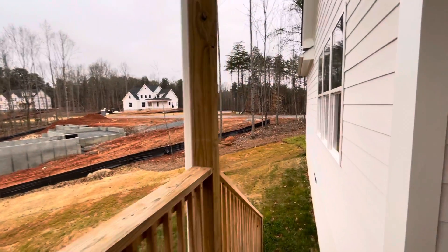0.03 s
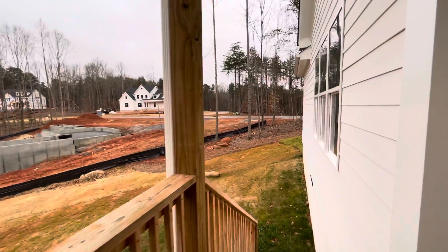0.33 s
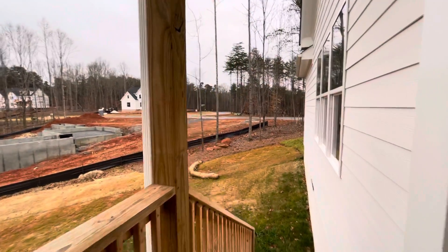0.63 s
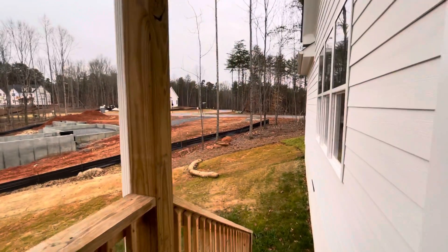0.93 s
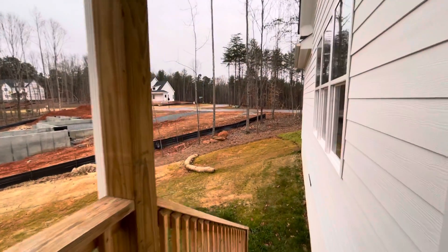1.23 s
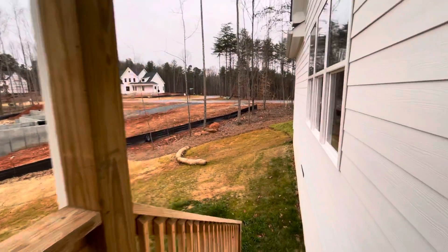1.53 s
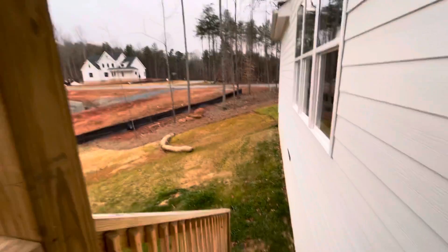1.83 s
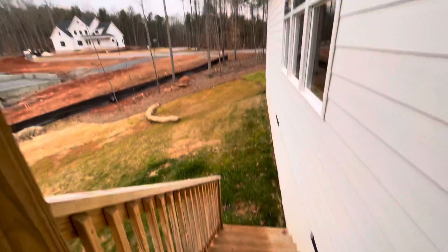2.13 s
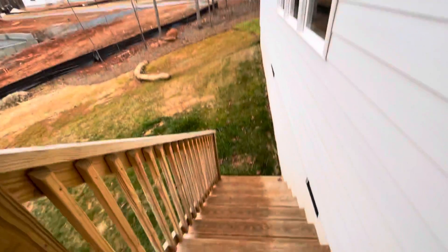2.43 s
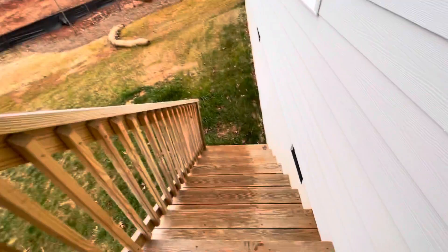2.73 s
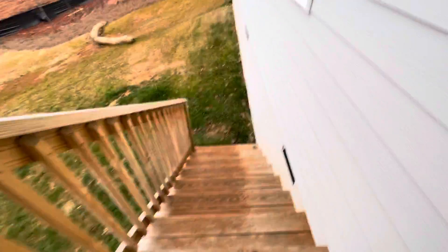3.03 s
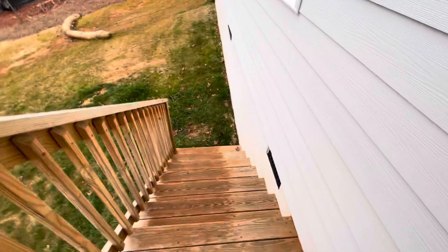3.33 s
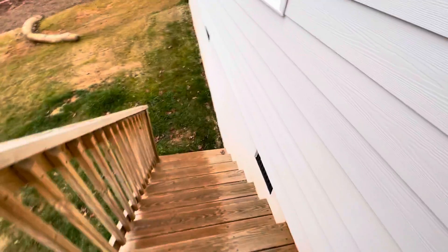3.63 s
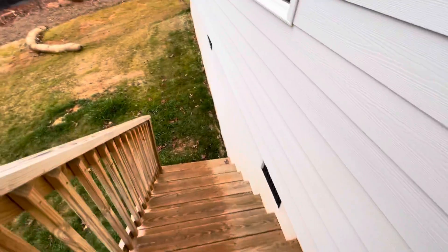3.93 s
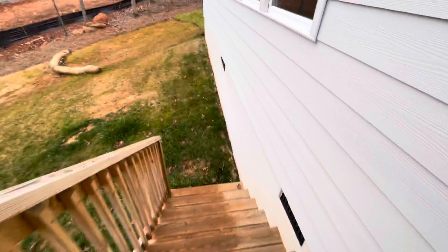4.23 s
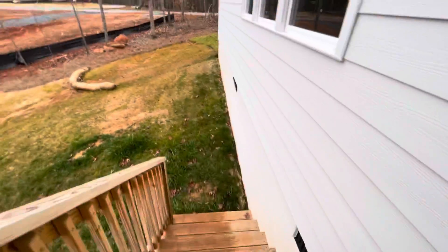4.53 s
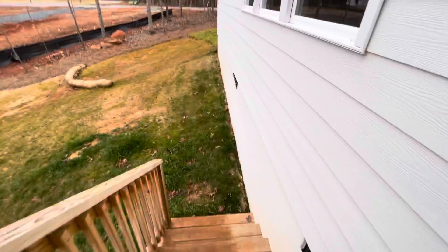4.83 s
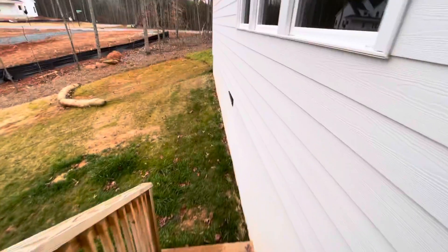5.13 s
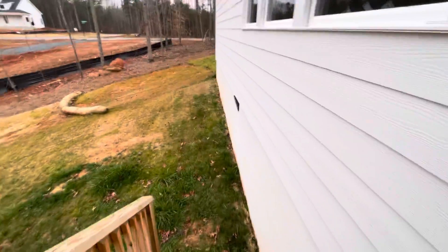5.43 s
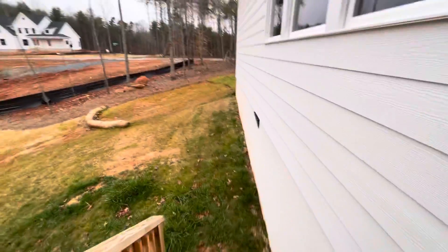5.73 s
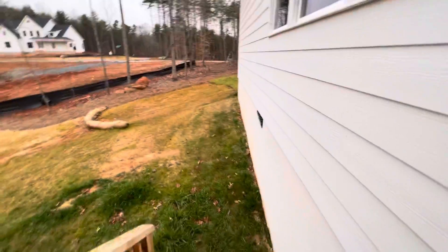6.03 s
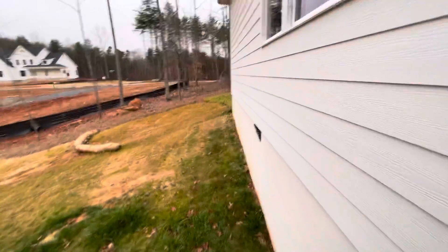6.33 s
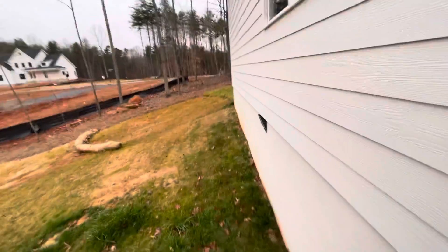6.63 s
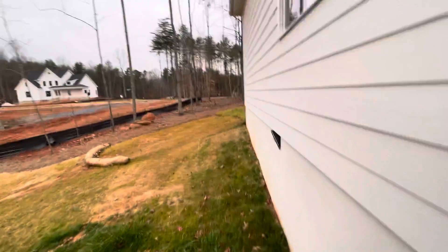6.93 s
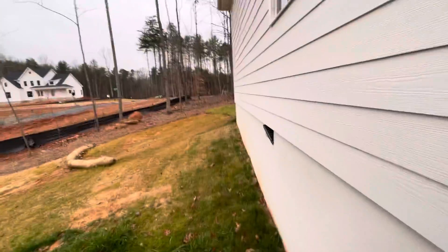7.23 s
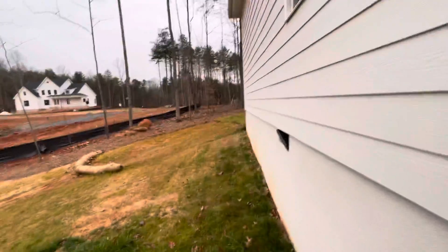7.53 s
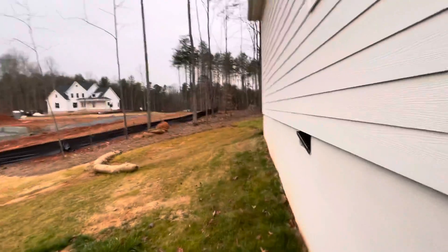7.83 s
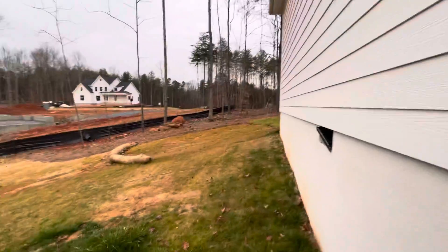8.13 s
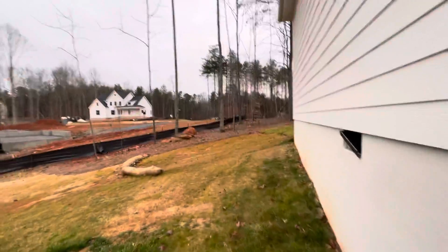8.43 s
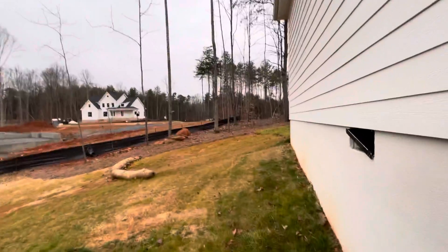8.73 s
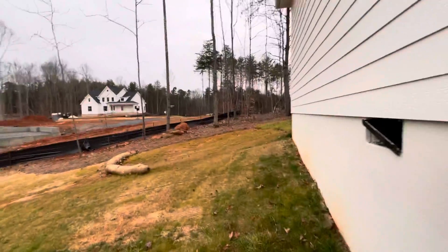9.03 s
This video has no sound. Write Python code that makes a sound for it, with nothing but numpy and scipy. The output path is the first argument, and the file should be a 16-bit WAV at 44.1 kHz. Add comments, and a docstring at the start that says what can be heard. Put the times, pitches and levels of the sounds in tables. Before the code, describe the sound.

Footsteps cross a wooden porch and clop down outdoor stairs, with swishing clothes over a distant machine rumble.

```python
"""Someone crosses a wooden porch with soft steps, clothes swishing, over the rumble of distant machines.
About 2.5 s in, a bird gives one thin, falling note and the boards begin to snap underfoot.
From 4.3 s the walker goes down the outdoor stairs: each footfall ticks and clops on a tread, rings
the plank and thumps the frame; a softer heel knock follows most landings. A few boards squeak against
their nails, and the cloth keeps swishing past the last step at 8.4 s."""
import sys
import numpy as np
from scipy import signal
from scipy.fft import rfft, irfft
from scipy.io import wavfile
from scipy.ndimage import uniform_filter1d

SR = 44100
rng = np.random.default_rng(int(sys.argv[2]) if len(sys.argv) > 2 else 0)


def digitize_waveform(pressure):
    """Quantize a signal to 16-bit integers and store it at the path in sys.argv[1].

    Rows of a 2-D input are taken as channels; values are limited to [-1, 1].
    """
    field = np.atleast_2d(pressure).T
    bounded = np.clip(field, -1, 1)
    quanta = np.round(bounded * 32767).astype(np.int16)
    wavfile.write(sys.argv[1], SR, quanta)


N = 409688
TIME = np.arange(N) / SR
AGE = TIME[:SR * 6 // 10]  # seconds since a hit


def footsteps():
    """Gentle porch steps, then hard stair landings; a softer heel knock follows most landings."""
    # soft porch steps: (time [s], knock [dB], thump [dB], pitch [ratio], deck send [dB])
    porch_steps = [(0.382, -47.5, -39, 0.59, 6), (0.418, -71, -37, 0.91, -18), (0.495, -36, -56, 1.09, 7.5),
                   (0.548, -44, -39, 1.12, 9.5), (0.701, -58.5, -64, 0.63, 13.5),
                   (1.377, -57, -34.5, 0.93, 2.5), (1.604, -47.5, -38, 0.86, 3.5),
                   (2.151, -58, -44, 1.5, 5), (3.047, -50.5, -42, 0.85, 7.5),
                   (3.098, -49.5, -41.5, 0.58, -6), (3.361, -47.5, -50.5, 1.19, 6.5)]
    # stair landings: (time [s], knock [dB], thump [dB], tick [dB], pitch [ratio], deck send [dB], clop [dB])
    stair_steps = [(4.3111, -28.5, -29.5, -48.5, 0.96, 4.5, -36), (5.071, -28, -32, -41.5, 1.006, 0, -32.5),
                   (5.6606, -29, -31, -38.5, 0.95, 1.5, -31.5), (6.198, -26, -35, -35, 1, 2.5, -30),
                   (6.764, -28, -21, -37, 1.02, -1.5, -31.5), (7.247, -18, -24.5, -34.5, 1.01, -6, -29),
                   (7.768, -31.5, -20.5, -40.5, 0.92, -0.5, -47), (8.3674, -26, -33, -51, 1.095, -1.5, -25)]
    # the rest of the foot coming down or shifting: (time [s], knock [dB], thump [dB])
    heels = [(4.356, -34, -42), (4.439, -37.5, -43), (5.031, -48, -58), (5.191, -48, -45),
             (5.373, -63, -43), (5.782, -44.5, -41.5), (6.219, -36.5, -55), (6.325, -47.5, -44),
             (6.881, -41.5, -43), (6.902, -30, -39), (7.876, -40.5, -35.5), (7.93, -50.5, -50)]
    out = np.zeros((2, N))
    for s, knock_db, thump_db, pitch, send_db in porch_steps:
        add(out, s, footfall(knock_db, thump_db, tick_db=-73, pitch=pitch, send_db=send_db))
    for s, knock_db, thump_db, tick_db, pitch, send_db, clop_db in stair_steps:
        add(out, s, footfall(knock_db, thump_db, tick_db, pitch, send_db) + amp(clop_db) * clop(pitch))
    for s, knock_db, thump_db in heels:
        add(out, s, footfall(knock_db, thump_db, tick_db=knock_db - 17, pitch=1.02, send_db=-3.5))
    return out


def footfall(knock_db, thump_db, tick_db, pitch, send_db):
    """The sole ticks, the plank knocks and the weight thumps the frame; knock and thump ring the deck."""
    # woody body of a tread: (untuned frequency [Hz], relative level [dB], t60 [s])
    plank_modes = [(211, -2.5, 0.093), (298, -1, 0.077), (384.4, 0.5, 0.2), (430, -3.5, 0.18),
                   (474.4, -6.5, 0.2), (528, 4, 0.082), (569.2, -4, 0.12), (617, 8.5, 0.027),
                   (721, -8.5, 0.061), (1035, -16.5, 0.13), (1370, -23, 0.072)]
    # low end of stringers and joists: (untuned frequency [Hz], relative level [dB], t60 [s])
    frame_modes = [(142.3, 0, 0.039), (150.9, -4, 0.14), (169.6, -4, 0.078)]
    # hard face of a tread: (untuned frequency [Hz], relative level [dB], t60 [s])
    face_modes = [(1306, 2.5, 0.043), (1930, -4, 0.024), (2240, -8, 0.02), (2900, -1.5, 0.029),
                  (3540, -7.5, 0.014)]
    # a sole meeting wood: (frequency [Hz], gain [dB])
    sole_eq = [(300, -13), (800, 3), (1400, -7.5), (2000, -5), (3000, -18.5), (3900, -20.5), (4800, -25.5),
               (9000, -32), (13000, -57)]
    plank = ring(plank_modes, pitch, lag_cycles=1.174, rise_cycles=0.75, scatter_db=3, apart_hz=740)
    frame = ring(frame_modes, pitch=0.93, lag_cycles=0.5, rise_cycles=1.5, scatter_db=6)
    sole = crack(sole_eq, decay_s=0.0028, tail_db=-9, tail_s=0.021)
    face_pitch = pitch * rng.uniform(0.9, 1.15)
    face = ring(face_modes, face_pitch, lag_cycles=0.75, rise_cycles=0.54, scatter_db=-0.5)
    tick = sole + amp(-4.5) * face
    send = amp(send_db) * np.hypot(amp(knock_db - 3), amp(thump_db - 11.5))
    wood = amp(knock_db) * plank + send * deck()
    return wood * pan(-2.3) + amp(thump_db) * frame * pan(-4) + amp(tick_db) * tick * pan(-0.36)


def clop(pitch):
    """The hollow clap of a tread: its first bending wave arrives treble first and dives in pitch."""
    start_hz, end_hz = 1935 * pitch, 347 * pitch
    slide_s, rise_s, decay_s, right_late_s = 0.000538, 0.0018, 0.0053, 0.00018
    t = np.maximum(AGE - np.array([[0], [right_late_s]]), 0)
    hz = end_hz + (start_hz - end_hz) / (1 + t / slide_s)
    turns = np.cumsum(hz * (t > 0), axis=1) / SR
    envelope = (1 - np.exp(-(t / rise_s) ** 2)) * np.exp(-t / decay_s)
    return struck(envelope * np.sin(2 * np.pi * turns)) * pan(-3.3)


def deck():
    """Countless weak modes of boards and rails, each band dying at its own speed."""
    # the tail spreading through deck and railing: (frequency [Hz], gain [dB], t60 [s])
    bands = [(50, -19, 0.063), (120, 2, 0.83), (263, -5.5, 0.33), (360, -0.5, 0.42), (607, -7.5, 0.35),
             (800, -21, 0.5), (1186, -22, 0.43), (2170, -42.5, 0.053), (5030, -55, 0.013)]
    shared, left, right = rng.standard_normal((3, len(AGE)))
    hz, t, spectrum = signal.stft(shared + 0.91 * np.array([left, right]), SR, nperseg=256)
    decay = amp(-60 * t / read(bands, hz, axis=2)[:, None])
    tail = signal.istft(spectrum * decay, SR, nperseg=256)[1][:, :len(AGE)]
    attack = 1 - np.exp(-AGE / 0.0014)
    return struck(colour(tail * attack, bands))


def bounces():
    """Whole spans of the deck bounce under the walker's weight, adding sub bass to a few steps."""
    # deep sways of the joists: (time [s], frequency [Hz], level [dB])
    sways = [(.385, 38.2, -34), (0.571, 39, -35.5), (1.385, 45.2, -38), (5.666, 82.3, -30.5)]
    t60 = 0.52
    out = np.zeros((2, N))
    for s, hz, db in sways:
        sway = ring([(hz, 0, t60)], pitch=1, lag_cycles=0.14, rise_cycles=0.34, scatter_db=0)
        add(out, s, amp(db) * sway * pan(-2.5))
    return out


def snaps():
    """Boards and grit snap underfoot: a dry crack layered with a hollow knock."""
    # snap cues: (time [s], crack [dB], knock [dB])
    cues = [(2.663, -85, -49), (2.944, -62, -55), (2.954, -55.5, -47), (3.05, -58, -46), (3.153, -65, -71),
            (3.523, -58, -46), (4.915, -81, -55), (6.9, -46.5, -40), (7.286, -38.5, -40), (7.295, -64, -35),
            (7.7946, -35, -33.5), (8.283, -63.5, -60), (8.414, -50.5, -41)]
    # the bright edge of a snap: (frequency [Hz], gain [dB])
    bright_eq = [(600, -59), (1500, 16), (3000, 11.5), (4400, 12), (5500, 4), (7200, 8.5), (10000, 0),
                 (13000, -16)]
    # a board shifting on its nails: (frequency [Hz], gain [dB])
    hollow_eq = [(200, -12), (600, 4.5), (950, -2.5), (1400, -4), (2200, -26), (6000, -35)]
    out = np.zeros((2, N))
    for s, crack_db, knock_db in cues:
        bright = crack(bright_eq, decay_s=0.0021, tail_db=-13, tail_s=0.015)
        hollow = crack(hollow_eq, decay_s=0.0054, tail_db=-12.5, tail_s=0.025)
        add(out, s, (amp(crack_db) * bright + amp(knock_db) * hollow) * pan(-1))
    return out


def squeaks():
    """Short, uneven slips of wood on nail, each rising in pitch and dulling as it runs out."""
    # slips: (time [s], length [s], start pitch [Hz], end pitch [Hz], level [dB], final overtones [dB])
    slips = [(4.434, 0.019, 1965, 2080, -52, -2), (7.285, 0.017, 1257, 1415, -37, -13.5),
             (7.811, 0.01, 1420, 1460, -41, 10), (7.823, 0.021, 1460, 1555, -36, 2)]
    # the nasal voice of the board: (frequency [Hz], gain [dB])
    board_eq = [(800, -20), (1550, 24), (3000, 7.5), (4500, 1), (6500, -13), (9000, -4), (12000, -29)]
    dulling_db, jitter, grit = 15, 0.041, 0.89
    out = np.zeros((2, N))
    for s, length, start_hz, end_hz, db, overtones_db in slips:
        progress = np.minimum(AGE / length, 1)
        hz = (start_hz + (end_hz - start_hz) * progress) * (1 + jitter * drift(len(AGE), size=16))
        phase = 2 * np.pi * np.cumsum(hz) / SR
        overtones = sum(np.cos(k * phase) for k in range(2, 7))
        tone = np.cos(phase) + amp(overtones_db + dulling_db * (1 - progress)) * overtones
        rubbing = grit * (1 + amp(overtones_db)) * rng.standard_normal((2, len(AGE)))
        squeak = colour((tone + rubbing) * np.sin(np.pi * progress), board_eq)
        add(out, s, amp(db) * struck(squeak, size=length * SR))
    return out


def clothes():
    """Threads catch and let go in tiny grains: a steady sliding, and a swish with each swing of a limb."""
    # steady sliding of the jacket: (time [s], base level [dB])
    sliding = [(0.0, -82), (0.78, -77.5), (1.27, -87), (1.6, -73.5), (1.9, -73), (2.33, -64), (2.7, -70.5),
               (2.89, -70.5), (3.0, -65.5), (3.72, -69.5), (3.77, -64), (4.3, -61.5), (5.0, -65.5),
               (6.45, -64.5), (7.3, -65), (7.97, -63), (8.28, -70.5), (8.55, -65.5), (8.76, -70.5),
               (8.9, -61), (9.29, -60.5)]
    # swings of sleeves and trouser legs: (centre time [s], length [s], swish [dB], rub [dB], silk [dB])
    strokes = [(0.18, 0.058, -71.5, -71, -72), (0.45, 0.15, -74, -64, -77.5), (1.465, 0.075, -67, -69, -78),
               (2.78, 0.12, -75, -57, -73), (3.328, 0.068, -67, -58, -84), (3.525, 0.11, -59, -56.5, -62.5),
               (3.95, 0.41, -57, -78, -58.5), (4.255, 0.25, -55, -74, -61), (4.837, 0.16, -57, -67, -60.5),
               (5.205, .13, -55.5, -51.5, -63.5), (5.496, 0.15, -56, -77, -56.5),
               (6.013, 0.093, -57.5, -59, -63), (6.307, 0.093, -60, -54, -70),
               (6.612, 0.13, -57.5, -73, -57.5), (6.883, 0.12, -54.5, -51.5, -65),
               (7.052, 0.11, -57.5, -60, -66), (7.342, 0.1, -56, -54, -73), (7.648, 0.089, -60, -71, -62.5),
               (7.867, .14, -60, -50.5, -75), (8.106, 0.14, -65.5, -62, -71),
               (9.126, 0.15, -55.5, -51, -60.5)]
    # bright swish: (frequency [Hz], gain [dB])
    swish_eq = [(1700, 4.5), (3000, 4.5), (4200, 4), (6000, 5.5), (8000, 7.5), (9400, 1.5), (11000, -36),
                (13500, -11)]
    # duller rub: (frequency [Hz], gain [dB])
    rub_eq = [(200, 5), (500, 4), (900, 1.5), (1400, 0.5), (2100, -3), (2900, -4.5), (4000, -10.5),
              (7000, -55)]
    # silky top: (frequency [Hz], gain [dB])
    silk_eq = [(4000, -38), (7500, -10.5), (9400, 1), (10500, -5), (13000, -16.5)]
    # where the cloth sits in the image: (frequency [Hz], left minus right [dB])
    sides = [(2500, 0), (3800, 0), (5700, 6), (7500, 2.5), (9000, -9), (10500, -11.5), (13000, 1.5)]
    # width of the cloth: (frequency [Hz], left-right likeness [0-1])
    alike = [(300, 0.18), (3000, 0.047), (12000, 0.16)]
    power = (amp(curve(sliding, TIME)) * amp([[0], [6], [-8.5]])) ** 2  # swish, rub, silk
    for s, length, *levels_db in strokes:
        swell = np.exp(-np.minimum(abs(2 * (TIME - s) / length), 4) ** 3)
        power += amp(levels_db)[:, None] ** 2 * swell
    layers = [noise(eq, alike, sides, grain_db=1, late_s=0.00043) for eq in (swish_eq, rub_eq, silk_eq)]
    out = np.zeros((2, N))
    for layer, envelope in zip(layers, np.sqrt(power)):
        flutter = amp(0.82 * drift(N, size=450))
        out += layer * envelope * flutter
    return out


def patchy_colour(rustle, depth_db):
    """Random, brief peaks and dips in the spectrum give the rustle a faint watery shimmer."""
    spectrum = signal.stft(rustle, nperseg=512)[2]
    patches = rng.standard_normal(spectrum.shape[1:])
    patches = uniform_filter1d(uniform_filter1d(patches, size=4, axis=0), size=10, axis=1)
    return signal.istft(spectrum * amp(depth_db * evened(patches)), nperseg=512)[1][:, :N]


def outdoors():
    """The rumble of distant machines swells slowly under a steady wash of air."""
    # far machines and open air: (frequency [Hz], gain [dB])
    bed_eq = [(12, -32), (22, -13), (35, -14), (50, -2.5), (70, 2.5), (90, -2), (160, -11.5), (300, -23.5),
              (500, -28), (1000, -36.5), (2800, -46), (4500, -68), (9000, -53), (13000, -99)]
    # width of the bed, mono in the bass: (frequency [Hz], left-right likeness [0-1])
    alike = [(30, 1), (150, 0.9), (500, 0.5), (1200, 0.28)]
    # swell of the rumble: (time [s], level before trim [dB])
    swell = [(0.0, -57), (0.46, -53.5), (8.23, -50), (8.72, -53), (9.29, -48)]
    crossover_hz, trim_db, air_db = 250, 5, -67
    bed = noise(bed_eq, alike) * pan(-2.9)
    rumble = signal.sosfiltfilt(signal.butter(2, crossover_hz, fs=SR, output="sos"), bed)
    return evened(rumble) * amp(curve(swell, TIME) + trim_db) + evened(bed - rumble) * amp(air_db)


def bird():
    """One thin, wavering, falling note from the trees."""
    # the whistle's path: (time [s], pitch [Hz], level [dB])
    note = [(2.44, 8050, -71), (2.52, 7850, -70), (2.72, 7720, -70), (2.87, 7570, -73)]
    t = np.arange(note[0][0], note[-1][0], 1 / SR)
    hz = curve(note, t) * (1 + 0.026 * drift(len(t), size=50))
    whistle = np.sin(2 * np.pi * np.cumsum(hz) / SR)
    out = np.zeros((2, N))
    add(out, t[0], amp(curve(note, t, axis=2)) * whistle * pan(-1.5))
    return out


def ring(modes, pitch, lag_cycles, rise_cycles, scatter_db, apart_hz=1150):
    """Modes of a beam: bending waves travel slower at low pitch, so each starts some cycles late."""
    out = np.zeros((2, len(AGE)))
    for hz, db, t60 in modes:
        detune, scatter, left, right = rng.standard_normal(4)
        hz = hz * pitch * (1 + 0.015 * detune)
        t = np.maximum(AGE - lag_cycles / hz, 0)
        attack = 1 - np.exp(-(t * hz / rise_cycles) ** 2)
        decay = amp(db + scatter_db * scatter - 60 * t / t60)
        phase = hz / apart_hz * np.array([[left], [right]])  # short waves reach the sides out of step
        out += attack * decay * np.sin(2 * np.pi * hz * t + phase)
    return struck(out)


def crack(eq, decay_s, tail_db, tail_s):
    """A burst of contact noise followed by its scatter off wall and railing."""
    envelope = np.exp(-AGE / decay_s) + amp(tail_db) * np.exp(-AGE / tail_s)
    return struck(colour(rng.standard_normal((2, len(AGE))) * envelope, eq))


def noise(eq, alike, sides=((1, 0), (2, 0)), grain_db=0, late_s=0):
    """Shaped stereo noise; grain roughens it, and the shared part reaches the right late_s later."""
    hz = np.fft.rfftfreq(N, 1 / SR)
    grains = amp(grain_db * np.repeat(rng.standard_normal(N // 32 + 1), 32)[:N])
    left, unrelated = rfft(rng.standard_normal((2, N)) * grains)
    likeness = np.clip(read(alike, hz), -1, 1)
    delayed = left * np.exp(-2j * np.pi * hz * late_s)
    right = likeness * delayed + np.sqrt(1 - likeness ** 2) * unrelated
    return evened(irfft(np.array([left, right]) * amp(read(eq, hz)) * pan(read(sides, hz)), N))


def colour(x, eq, size=2048):
    """Minimum-phase EQ: nothing rings ahead of a hit."""
    log_gain = np.log(amp(read(eq, abs(np.fft.fftfreq(size, 1 / SR)))))
    taps = np.fft.ifft(np.exp(np.conj(signal.hilbert(log_gain)))).real
    return signal.oaconvolve(x, taps[None], axes=1)[:, :x.shape[1]]


def drift(count, size):
    """A smooth random wobble of rms one that changes about every size samples."""
    return evened(uniform_filter1d(uniform_filter1d(rng.standard_normal(count), size), size))


def amp(db):
    """Decibels to gain."""
    return 10 ** (np.asarray(db) / 20)


def pan(db):
    """Gains of the two channels for a left-minus-right level."""
    return amp(np.array([[0.5], [-0.5]]) * db)


def evened(x):
    """Scales to an rms of one."""
    return x / np.sqrt(np.mean(x ** 2) + 1e-20)


def struck(x, size=1024):
    """Scales a hit so that its energy equals an rms of one over size samples."""
    return x / np.sqrt(np.mean(np.sum(x ** 2, -1)) / size + 1e-20)


def read(points, hz, axis=1):
    """Reads a column of a spectrum table on a log-frequency axis."""
    table = np.transpose(points)
    return np.interp(np.log(hz + 1), np.log(table[0] + 1), table[axis])


def curve(rows, t, axis=1):
    """Reads a column of a time table."""
    table = np.transpose(rows)
    return np.interp(t, table[0], table[axis])


def add(mix, s, sound):
    """Mixes a stereo sound in at time s."""
    part = mix[:, max(round(s * SR), 0):][:, :sound.shape[-1]]
    part += sound[..., :part.shape[-1]]


def scene():
    """The walker on the wood, the clothes up close and the open air behind."""
    wood = footsteps() + bounces() + snaps() + squeaks()
    return wood + patchy_colour(clothes(), depth_db=3) + outdoors() + bird()


def record(dry):
    """A steep high cut takes off the very top."""
    cutoff_hz = 13600
    taps = signal.firwin(511, cutoff_hz, window=("kaiser", 9), fs=SR)
    return signal.oaconvolve(dry, taps[None], "same")


dry = scene()
out = record(dry)
digitize_waveform(out)
```